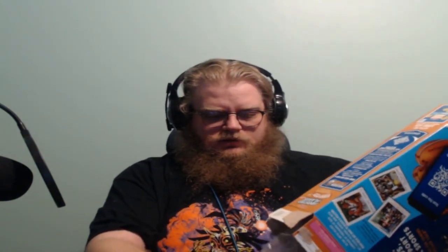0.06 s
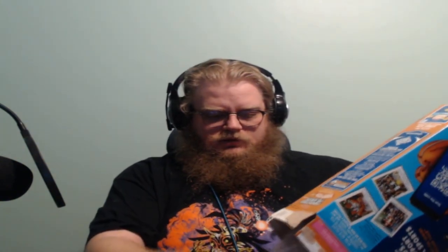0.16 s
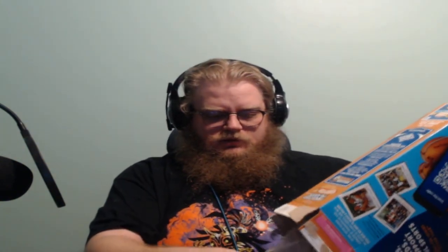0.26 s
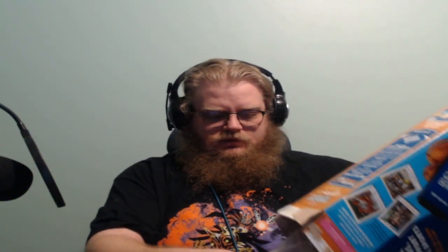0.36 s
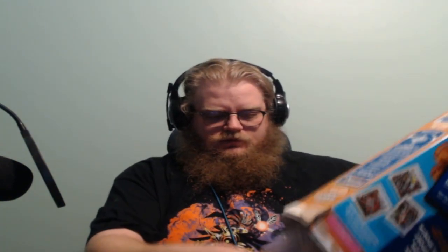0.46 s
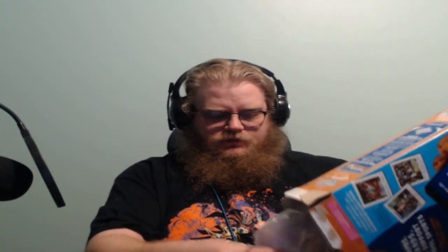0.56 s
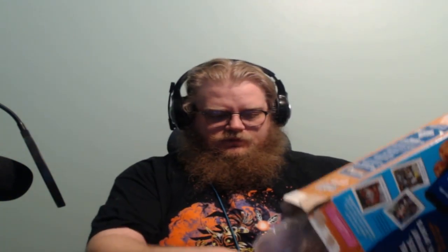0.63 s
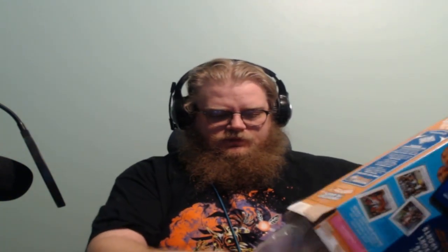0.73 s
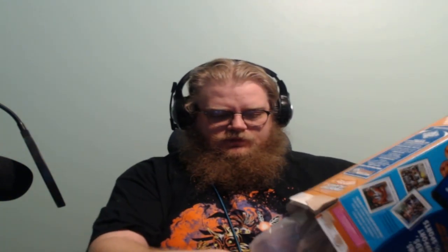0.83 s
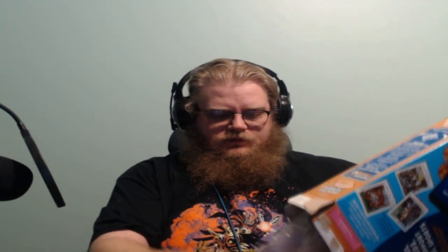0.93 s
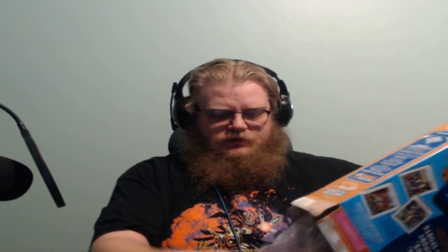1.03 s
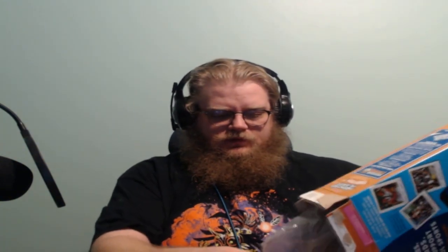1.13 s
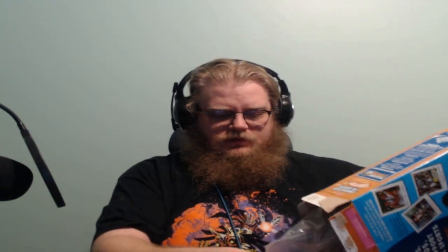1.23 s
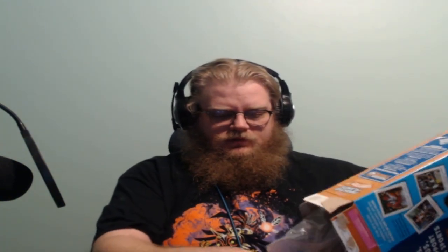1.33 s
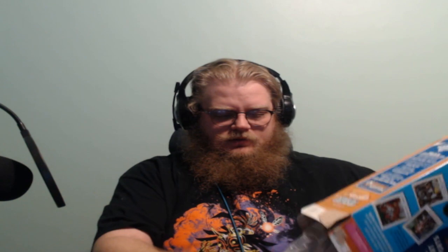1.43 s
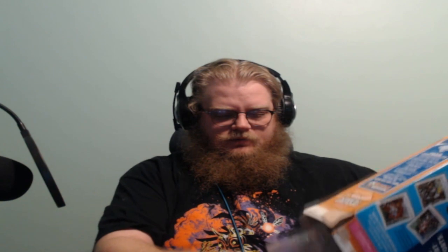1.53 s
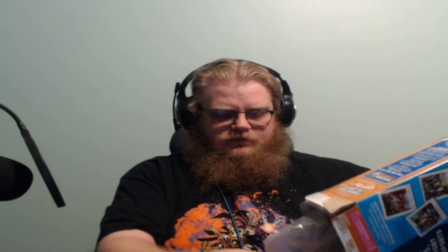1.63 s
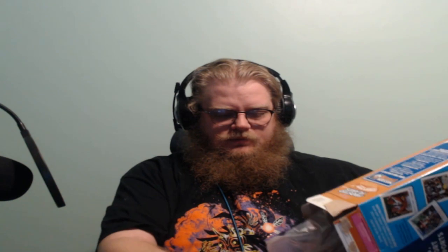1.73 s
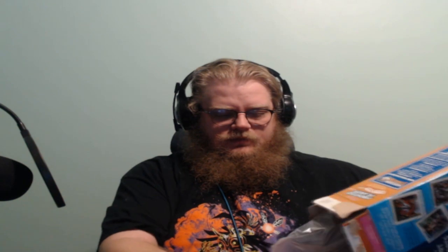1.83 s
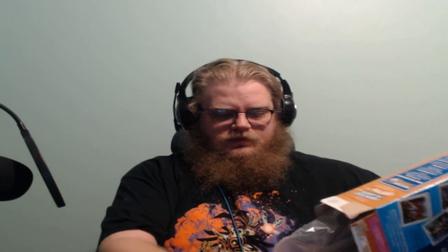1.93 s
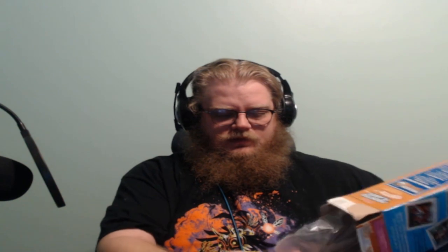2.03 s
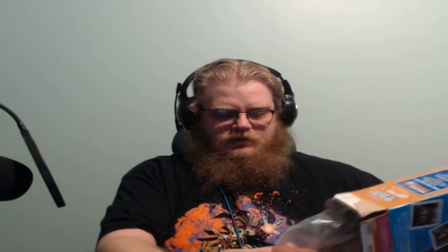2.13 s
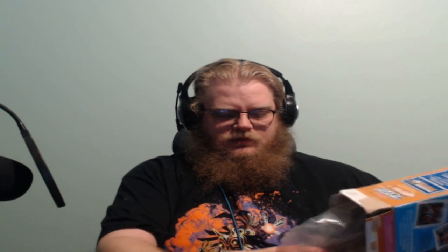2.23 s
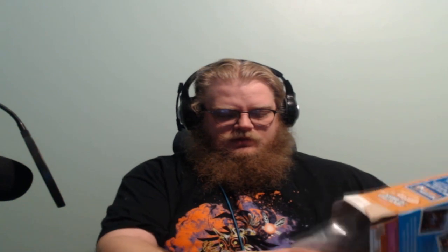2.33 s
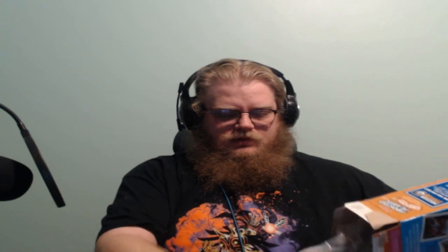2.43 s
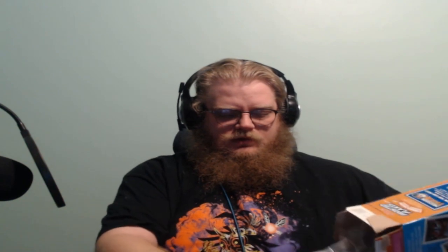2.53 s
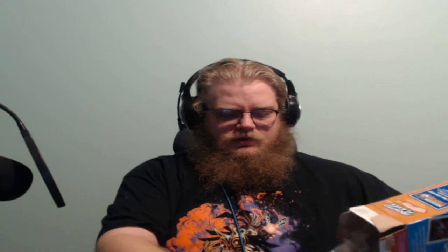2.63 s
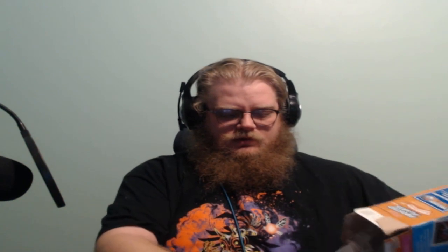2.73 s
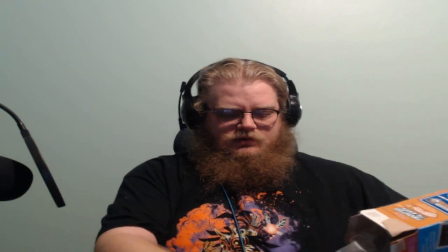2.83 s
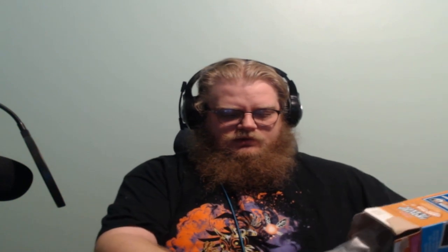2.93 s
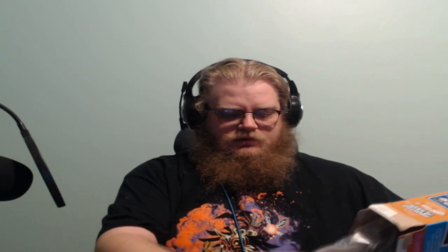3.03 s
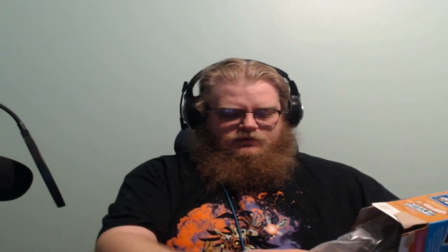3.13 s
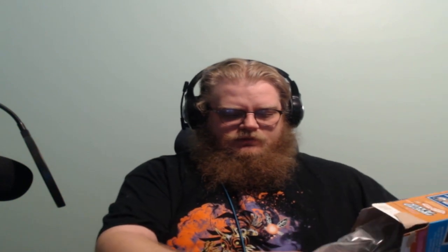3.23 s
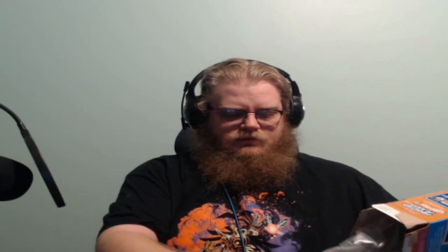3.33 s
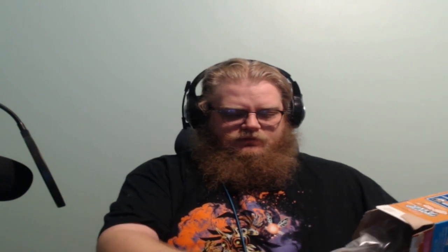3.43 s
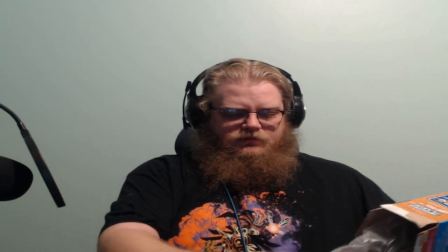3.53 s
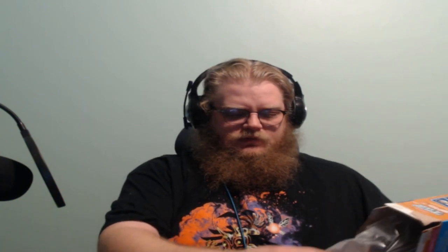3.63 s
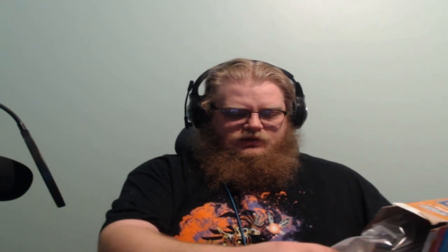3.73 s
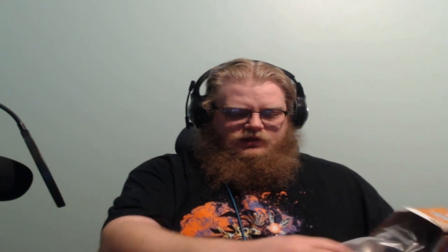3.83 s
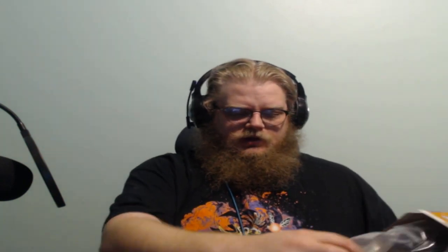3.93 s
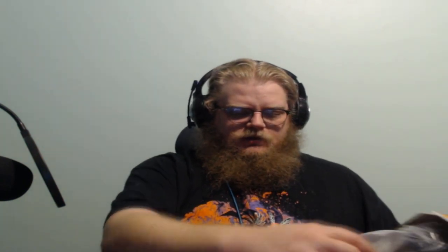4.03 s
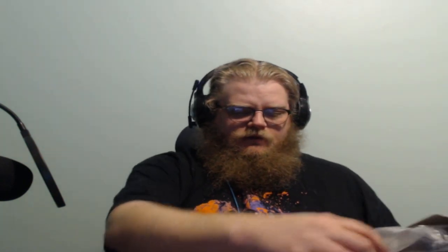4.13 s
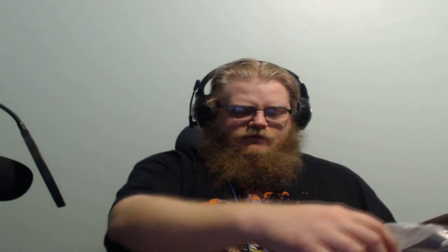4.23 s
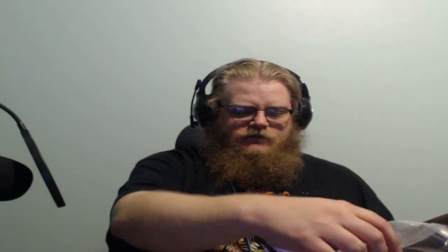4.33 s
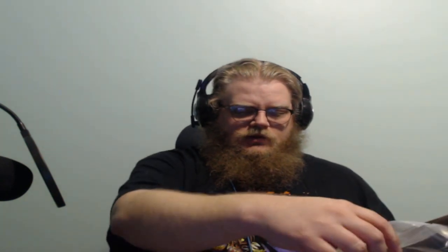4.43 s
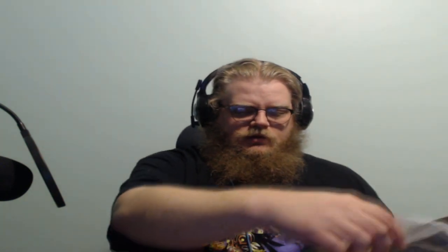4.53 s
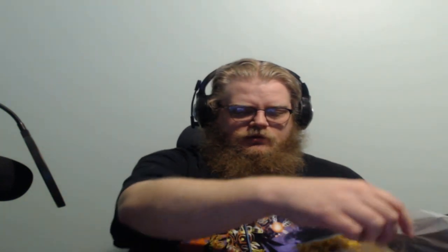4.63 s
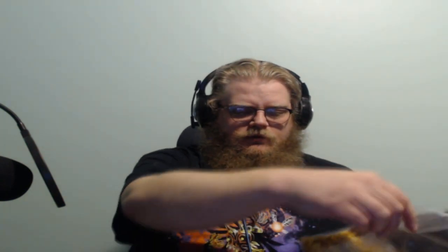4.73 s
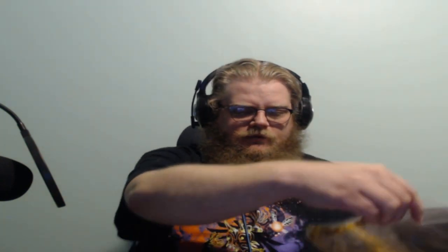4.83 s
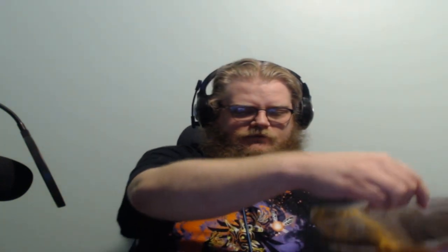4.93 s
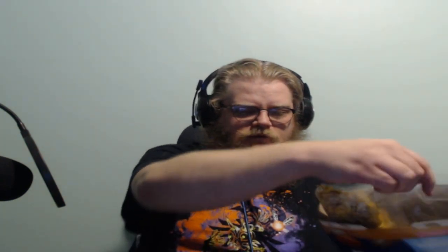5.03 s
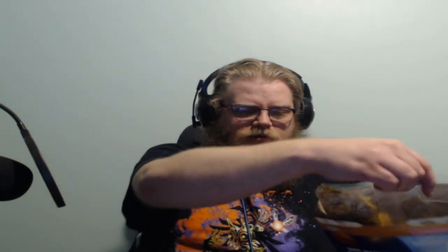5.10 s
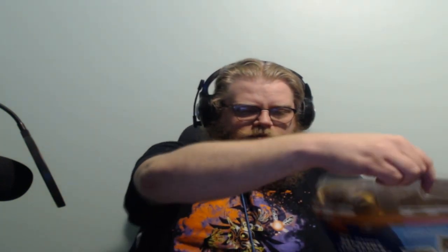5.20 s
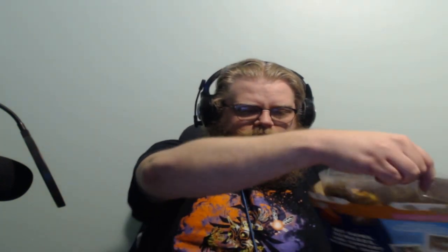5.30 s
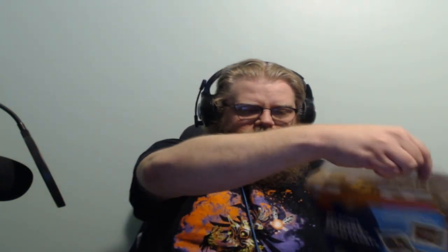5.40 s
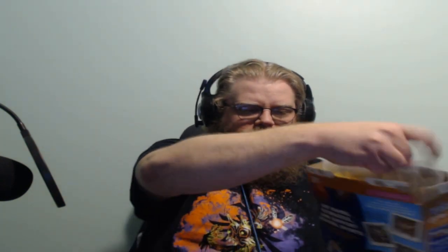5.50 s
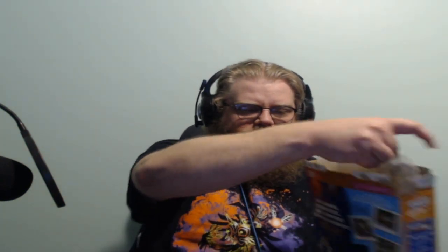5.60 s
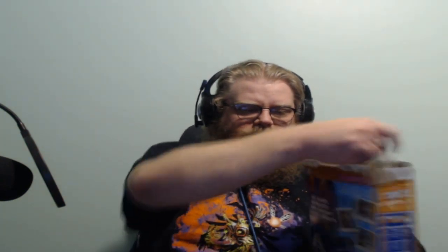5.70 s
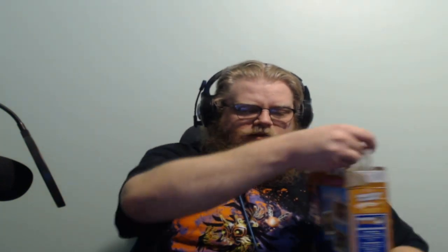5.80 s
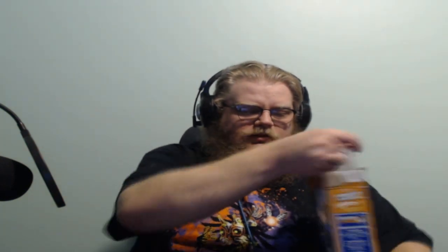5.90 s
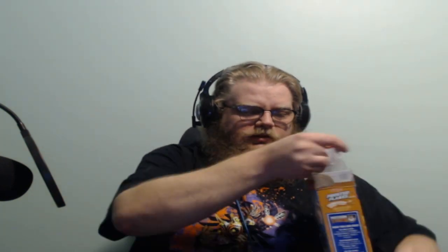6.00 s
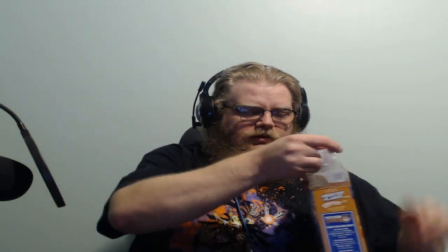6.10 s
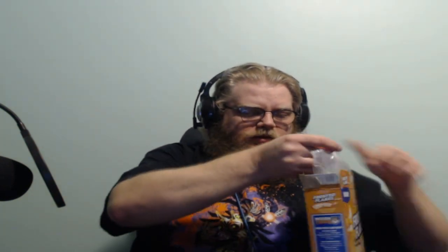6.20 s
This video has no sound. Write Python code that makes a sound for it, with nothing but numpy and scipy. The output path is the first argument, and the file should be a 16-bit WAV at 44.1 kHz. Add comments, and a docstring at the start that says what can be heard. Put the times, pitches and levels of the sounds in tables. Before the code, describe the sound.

Dry cereal pours from a plastic bag inside a cardboard box into a bowl, rustling in uneven surges with crunches, sharp bag cracks and soft box thumps. The stream thins to single flakes ticking and skittering on the ringing bowl, broken by brief silences. Then the box tips back and the flakes slide down and thump at its bottom. Close microphone at a desk in a small dry room, with a faint fan hum.

```python
"""Dry cereal slides from a plastic bag in a cardboard box into a bowl on a desk, close up, over a fan's hum.
For nearly three seconds the stream of colliding flakes rustles, handfuls crunch, the bag snaps and cracks
and the box thumps. In the lull that follows, single flakes tick and skitter on the ringing bowl, and the
sound drops out three times. From 4.6 s the box is tipped back: the flakes slide home and thump on its
bottom."""
import sys
import numpy as np
from scipy import signal
from scipy.fft import rfft, irfft
from scipy.io import wavfile

SR = 44100
rng = np.random.default_rng(int(sys.argv[2]) if len(sys.argv) > 2 else 0)


def to_wav(s):
    """Save 16-bit WAV."""
    ch = np.atleast_2d(s).T  # columns
    pcm = np.round(np.clip(ch, -1, 1) * 32767)  # PCM
    wavfile.write(sys.argv[1], SR, pcm.astype(np.int16))


N = 276066


def amp(db):
    """Gain of a level in dB."""
    return 10 ** (np.asarray(db) / 20)


def unit_rms(x):
    """The signal scaled to rms 1."""
    return x / np.sqrt(np.mean(x ** 2) + 1e-20)


def eq_db(curve, hz):
    """Level of an EQ curve at hz, read on a log frequency axis."""
    curve_hz, curve_db = np.transpose(curve)
    return np.interp(np.log(hz), np.log(curve_hz), curve_db)


def drift(rate_hz):
    """Smooth random modulation of rms 1."""
    pole = np.exp(-80 * np.pi * rate_hz / SR)
    slow = signal.lfilter([1], [1, -2 * pole, pole * pole], rng.standard_normal(N // 40 + 2002))[2000:]
    return np.interp(np.arange(N) / 40, np.arange(len(slow)), unit_rms(slow))


def band(x, low_hz, high_hz):
    """Gentle band-pass."""
    sos = signal.butter(2, [low_hz, min(high_hz, .45 * SR)], "band", fs=SR, output="sos")
    return signal.sosfilt(sos, x)


def resonance(x, hz, width_hz):
    """Two-pole resonator with gain 1 at its peak."""
    r = np.exp(-np.pi * width_hz / SR)
    gain = (1 - r * r) / 2
    return signal.lfilter([gain, 0, -gain], [1, -2 * r * np.cos(2 * np.pi * hz / SR), r * r], x)


def contacts(per_s, spread_db):
    """Random clicks at rms 1; a positive spread makes a few stand out from many small ones."""
    sizes = amp(spread_db * np.minimum(rng.exponential(1, N), 5)) * rng.choice([-1, 1], N)
    return unit_rms(sizes * (rng.random(N) < per_s / SR))


def add(out, start_s, sound):
    """Mixes a short sound in at start_s."""
    at = round(start_s * SR)
    out[at:at + len(sound)] += sound[:N - at]


def decay(t60, size=9000):
    """An envelope that falls 60 dB in t60 seconds."""
    return amp(-60 * np.arange(size) / (SR * max(t60, .0005)))


def swell(t60, rise_s, size=9000):
    """A decay with a rounded attack."""
    return (1 - np.exp(-np.arange(size) / (SR * rise_s))) * decay(t60, size)


# The hum of fan and motor. Each row: pitch in Hz, level in dB.
FAN_TONES = [(40, -71), (48, -72.5), (120, -73.5), (140, -81), (242, -74)]
# The colour of the fan's moving air. Each row: frequency in Hz, relative level in dB.
FAN_AIR_EQ = [(20, -3), (35, 0), (60, -5), (85, -16), (170, -12), (300, -14), (1000, -24), (15000, -42)]


def fan():
    """Two close low tones beat into a throb, with wavering motor hum and a soft bed of air."""
    t = np.arange(N) / SR - .012   # the tones are in phase at 12 ms
    hum = sum(np.sqrt(2) * amp(db + 3 * drift(5.2)) * np.cos(2 * np.pi * hz * t) for hz, db in FAN_TONES)
    hz = np.maximum(np.fft.rfftfreq(N, 1 / SR), 1)
    air = irfft(rfft(rng.standard_normal(N)) * amp(eq_db(FAN_AIR_EQ, hz)) * (hz > 18), N)
    return hum + amp(-71) * unit_rms(air)


def hiss(until_s):
    """A very faint, flickering top-end hiss that cuts off at until_s."""
    out = amp(-82.5 + 5 * drift(7.3)) * band(rng.standard_normal(N), 10000, 16000)
    out[round(until_s * SR):] = 0
    return out


def room(x, t60=0.2, wet_db=-13):
    """The reverb of a small dry room: a short noise tail in a low and a high band."""
    low, high = rng.standard_normal((2, 9000))
    tail = band(low, 120, 3200) * decay(t60) + band(high, 2700, 12000) * decay(1.1 * t60)
    tail[:130] = 0   # pre-delay: a metre of path to the first reflection
    return amp(wet_db) * signal.fftconvolve(x, tail / np.linalg.norm(tail))[:N]


# Holes in the lull. Each row: start of the fade, end of the fade, return to full level, all in seconds.
DROPOUT_TIMES = [(3.29, 3.352, 3.588), (3.94, 3.98, 4.075), (4.43, 4.49, 4.577)]


def dropout_gain(depth_db=45, return_s=.012):
    """A fader that sinks to near silence in each drop-out and springs back."""
    t, gain_db = np.arange(N) / SR, np.zeros(N)
    for fade, down, back in DROPOUT_TIMES:
        gain_db -= depth_db * np.interp(t, [fade, down, back - return_s, back], [0, 1, 1, 0]) ** 1.85
    return amp(gain_db)


# Weight landing in the box. Each row: start in seconds, relative level in dB, pitch of the wall in Hz.
BOX_THUMPS = [(0.158, -21.5, 243), (0.55, -17.5, 305), (1.035, -19, 336), (2.078, -24, 344),
              (2.27, -25, 413), (2.406, -20.5, 241), (2.49, -25, 400), (2.182, -26, 347),
              (2.612, -18.5, 450), (2.995, -37, 332), (3.93, -55, 355), (4.746, -39, 310),
              (2.976, -37, 333), (3.238, -29, 334), (5.3, -24, 165), (5.505, -16, 394), (5.572, -17, 404),
              (4.081, -27.5, 521), (4.083, -32, 361), (5.75, -18, 126.4), (5.772, -16, 130),
              (5.691, -28.5, 151), (5.748, -32, 66), (5.99, -38, 41), (5.82, -26, 141),
              (5.871, -30.5, 45.7), (5.997, -27.5, 128)]


def box_thumps(size=18000):
    """A push sets a cardboard wall ringing low; the blow itself is a higher knock of a few cycles."""
    out, t = np.zeros(N), np.arange(size) / SR
    for start, db, hz in BOX_THUMPS:
        wall_t60 = 0.12 * (330 / hz) ** 0.4   # deeper walls ring longer
        wall = np.sin(2 * np.pi * hz * t) * swell(wall_t60, 0.23 / hz, size)
        knock = np.sin(2 * np.pi * 1.4 * hz * t) * swell(6.3 / hz, 0.17 / hz, size)
        add(out, start, amp(db - 10.5) * (wall + amp(-1.5) * knock))
    return out


# The ring of the bowl. Each row: pitch in Hz, bandwidth in Hz, gain in dB.
BOWL_MODES = [(1370, 29, -12), (2140, 15, -25.5), (3074, 37, -3.5), (3280, 65, -6), (4340, 38, -8),
              (5530, 30, -8.5), (6750, 290, -6), (7800, 300, -4)]
# Flakes skittering on the bare bowl. Each row: start in seconds, level in dB, 60 dB decay in seconds.
SKITTERS = [(2.807, -23.5, 0.18), (2.967, -28.5, 0.2), (3.201, -35, 0.28), (3.581, -33, 0.4),
            (4.25, -53, 0.15)]


def bowl_skitters(size=12000):
    """Each skitter is a dying run of hops that strikes every mode of the bowl with a random strength."""
    out, hops = np.zeros(N), contacts(600, spread_db=4)
    for start, db, t60 in SKITTERS:
        run = hops[round(start * SR):][:size] * swell(t60, 0.0029, size)
        for hz, width_hz, mode_db in BOWL_MODES:
            strength = amp(db + mode_db + 3.2 * rng.standard_normal())
            add(out, start, strength * resonance(run, hz, width_hz))
    return out


def rattle(hz, t60, q, size=3000):
    """One clean touch and a short run of lighter contacts ring a flake's one resonance; peak 1."""
    touches = rng.standard_normal(size) * swell(t60, 0.0018, size)
    touches[0] = np.linalg.norm(touches)   # the first touch has as much energy as all the rest
    ring = resonance(resonance(touches, hz, hz / q), hz, hz / q)
    return ring / np.abs(ring).max()


# Single flakes and creases. Each row: start in seconds, level in dB, pitch in Hz.
FLAKE_TICKS = [(0.066, -24, 7500), (1.047, -32, 6340), (1.56, -37, 4960), (1.68, -36, 3100),
               (1.442, -29.5, 2480), (1.472, -24, 4000), (1.914, -44.5, 5500), (1.797, -38.5, 3670),
               (1.931, -36, 4300), (1.955, -36, 3860), (2.276, -26, 11300), (2.323, -27, 2420),
               (2.357, -33, 2380), (2.757, -26.5, 10000), (2.804, -37, 11600), (2.81, -44, 3130),
               (2.823, -30, 6170), (2.845, -34.5, 2020), (2.968, -44, 4200), (2.976, -37.5, 4260),
               (3.001, -47, 4200), (3.242, -42, 1515), (3.826, -51.5, 905), (2.974, -36.5, 1355),
               (3.035, -44.5, 2650), (3.202, -51, 5770), (3.223, -41.5, 886), (3.274, -45, 7460),
               (3.586, -44, 8700), (3.623, -43, 6730), (3.689, -49, 2370), (3.709, -46, 10500),
               (3.767, -43, 6500), (3.785, -44.5, 669), (3.789, -45, 1770), (3.792, -45, 4860),
               (3.904, -50.5, 4760), (4.117, -37, 11800), (4.201, -51, 2430), (4.2067, -41.5, 893),
               (4.251, -43.5, 5200), (4.281, -48.5, 1846), (4.309, -45, 6500), (4.325, -51.5, 3250),
               (4.325, -48, 6000), (4.353, -44, 11900), (4.445, -62, 7340), (5.026, -49, 3130),
               (5.257, -40, 8000), (5.765, -42, 2510), (5.843, -37.5, 4930), (5.985, -38, 3820),
               (6.123, -40, 2510)]


def flake_ticks(t60=0.045):
    """A flake lands: a pitched rattle and four weaker random partials over a broad scratch."""
    out = np.zeros(N)
    for start, db, hz in FLAKE_TICKS:
        ratios = 2 ** rng.uniform(-1.2, 1.2, 4)
        partials = sum(rattle(min(hz * ratio, 14000), t60, q=16) for ratio in ratios)
        body = rattle(hz, t60 * (2000 / hz) ** 0.3, q=7.1)   # higher flakes die sooner
        scratch = rattle(hz, 0.025, q=0.96)
        add(out, start, amp(db) * (body + amp(-12.5) * partials + amp(-1.5) * scratch))
    return out


# Handfuls crunching. Each row: centre in seconds, level in dB, half length in seconds, treble tilt in dB.
HANDFULS = [(1.517, -25, 0.0047, 9), (2.084, -29, 0.013, 9), (2.222, -31.5, 0.0025, 15),
            (2.247, -27.5, 0.015, -25), (2.278, -32, 0.0077, -9), (2.333, -28, 0.012, 3),
            (2.627, -30, 0.013, -12), (4.699, -32.5, 0.0088, 1), (4.805, -36, 0.0055, 14.5),
            (4.87, -40, 0.0049, 20.5), (4.884, -27, 0.0023, 6), (5.061, -26, 0.0053, -14),
            (5.166, -31.5, 0.0026, 10), (5.298, -24.5, 0.015, -6), (5.32, -25, 0.0044, 10),
            (5.373, -40, 0.0087, 10), (5.473, -28, 0.005, 7), (5.534, -23.5, 0.012, -0.5),
            (5.575, -26.5, 0.0078, -3.5), (6.105, -29, 0.0044, -6), (6.193, -28, 0.0045, -11)]


def handful_crunches():
    """Flakes crush together: dense grit under a bell-shaped swell, in a low and a high band."""
    low, high = np.zeros((2, N))
    t = np.arange(N) / SR
    for centre, db, half_s, tilt_db in HANDFULS:
        near = slice(int((centre - .05) * SR), int((centre + .05) * SR))
        bell = amp(db) * np.exp(-.5 * ((t[near] - centre) / half_s) ** 2)
        low[near] += bell
        high[near] += bell * amp(tilt_db)
    grit = contacts(8100, spread_db=-0.5)
    top = band(band(high * grit, 2800, 8360), 2300, 11690)
    return band(low * grit, 500, 3500) + amp(-4.5) * top


# Dry cracks of the bag. Each row: start in seconds, relative level in dB, pitch in Hz.
BAG_CRACKS = [(0.159, -15, 4000), (0.2174, -12, 7700), (0.5536, -15, 6140), (0.9071, -6, 9400),
              (1.046, -12, 12500), (0.949, -13.5, 2500), (1.224, -18.5, 2390), (1.24, -36, 4500),
              (1.311, -22, 2700), (1.36, -32, 4850), (1.4567, -3, 9630), (1.644, -17, 3300),
              (1.729, -24, 1500), (1.8173, -23, 5300), (2.132, -14, 3500), (2.168, -16, 4800),
              (2.178, -15, 7290), (2.27, -16, 4460), (2.2868, -11, 4430), (2.3564, -14, 12500),
              (2.596, -18, 6590), (2.605, -8.5, 6800), (2.757, -33, 10900), (2.809, -17, 11800),
              (2.825, -30, 6220), (2.847, -27, 3000), (2.978, -33, 4300), (2.9783, -29, 2100),
              (3.001, -35, 6400), (3.033, -35.5, 5530), (3.606, -35, 8270), (3.6244, -39, 8350),
              (3.645, -31, 8090), (3.709, -41, 10700), (4.09, -27.5, 9580), (4.116, -28, 12400),
              (4.177, -31, 13900), (4.3101, -39, 6400), (4.3557, -39, 11600), (4.7904, -26.5, 4320),
              (4.849, -20, 6630), (5.051, -24, 1500), (5.209, -18, 5450)]


def bag_cracks(ring_cycles=5.5, size=200):
    """A crease gives way in one click that rings for a few cycles at its own pitch."""
    out, t = np.zeros(N), np.arange(size) / SR
    for start, db, hz in BAG_CRACKS:
        ring = np.sin(2 * np.pi * hz * t + 1.1) * decay(ring_cycles / hz + 0.00078, size)
        add(out, start, amp(db - 2.5) * ring)
    return out


# Snaps of bag and flakes. Each row: start in seconds, relative level in dB, crispness in dB.
BAG_SNAPS = [(0.056, -19.5, 4), (0.159, -8.5, 3), (0.216, -18, 3.5), (0.245, -25.5, -10.5),
             (0.407, -21, 2.5), (0.445, -38, -12), (0.517, -21.5, 3.5), (0.529, -24, -1), (0.545, -18.5, 6),
             (0.551, -8, 2), (0.649, -22.5, 2), (0.713, -19, 4), (0.844, -27, -12.5), (0.88, -18, 4),
             (0.907, -11.5, 9), (0.946, -19.5, 3), (1.221, -30.5, 2), (1.31, -33, -10), (1.359, -32.5, -11),
             (1.455, -8.5, 3), (1.602, -27, -1), (1.617, -23, -7), (1.748, -28.5, 17), (1.817, -31, -6.5),
             (2.015, -36, 17), (2.046, -24.5, 8), (2.094, -34, 23.5), (2.238, -25, -9), (2.287, -24, 2),
             (2.312, -17, -1), (2.409, -14.5, 2.5), (2.42, -25, -11), (2.526, -21.5, 0), (2.595, -23.5, -3),
             (2.606, -22, 4), (2.707, -28, 20), (4.742, -20.5, -5), (4.774, -23.5, 8), (4.79, -22.5, -4),
             (5.21, -25, 3), (6.035, -25, -4.5), (6.102, -37, -13), (6.189, -35.5, 0)]


def bag_snaps():
    """The film snaps in a three-band noise burst: the lows swell later and last longer, the highs crack."""
    dull, middle, crisp = np.zeros((3, N))
    for start, db, crisp_db in BAG_SNAPS:
        middle_db = db - crisp_db / 2
        dull_db = -21 + 0.79 * (middle_db + 22) - 2 * rng.standard_normal()
        t60 = 0.035 * amp(0.074 * (middle_db + 36))   # bigger snaps last longer
        add(dull, start, amp(dull_db) * swell(1.54 * t60, 0.0041))
        add(middle, start, amp(middle_db + 3) * (swell(0.013, 0.0019) + 0.66 * swell(t60, 0.0019)))
        add(crisp, start, amp(middle_db + crisp_db + 5) * (swell(0.01, 0.0019) + 0.13 * swell(t60, 0.003)))
    noise = rng.standard_normal(N)
    noise[[round(start * SR) + 12 for start, _, _ in BAG_SNAPS]] = 2.5   # a clean click as the film gives
    return band(dull * noise, 140, 1400) + band(middle * noise, 740, 5000) + band(crisp * noise, 3500, 11000)


# The steady flow of the pour. Each row: time in seconds, level in dB, treble tilt in dB.
STEADY_FLOW = [(0, -44.5, -5.5), (.12, -33.5, -2.5), (.33, -47.5, 7), (.5, -44.5, -5), (.66, -36.5, -5),
               (.84, -39, -11), (.97, -37, -6), (1.16, -48, 2.5), (1.4, -40.5, -11.5), (1.86, -51, -18),
               (1.99, -52, -35), (2.067, -34, -10.5), (2.33, -38.5, -2), (2.45, -42, -8.5),
               (2.62, -37.5, -4), (2.76, -52, 8), (2.86, -55.5, 12), (2.95, -74, 6.5), (4.546, -83.5, -12),
               (4.594, -45, -32), (4.66, -44, -45.5), (4.688, -39, -27), (4.87, -35, -4.5),
               (5.0, -38.5, -26), (5.45, -38, -10.5), (5.62, -41.5, -10.5), (5.99, -45, -20.5),
               (6.26, -69, -44)]
# Heaps slipping at once. Each row: start in seconds, level in dB, treble tilt in dB, 60 dB decay in seconds.
HEAP_SLIPS = [(.15, -48, -6, 0.37), (.405, -38, -16, 0.94), (.53, -30, -6, 0.15), (.885, -43.5, 26, 0.9),
              (1.216, -34, -15, 0.15), (1.436, -30, -4, 0.54), (1.599, -31, -5.5, 0.34),
              (1.69, -37.5, -7.5, 0.86), (1.881, -39, -9.5, 0.42), (2.969, -44.5, -13, 0.4),
              (3.196, -41.5, -11.5, 0.39), (3.586, -73, 29, 0.91), (3.778, -56, -18, 0.51),
              (4.064, -43.5, -1.5, 0.37), (4.2, -59, -24, 0.34), (4.25, -46.5, -29, 0.21),
              (5.289, -28.5, -10, 0.43), (4.67, -36, -9, 0.43), (5.1, -38.5, 5, 0.62),
              (5.474, -30, -8.5, 0.71), (5.698, -35, -21.5, 0.67), (6.02, -37, -2, 0.26),
              (6.093, -38.5, -19, 0.44), (6.183, -38, -18, 0.35)]


def pour_envelopes():
    """Level and treble of the stream in dB: the steady flow plus slips that swell fast and die away."""
    times, flow_db, flow_treble_db = np.transpose(STEADY_FLOW)
    t = np.arange(N) / SR
    power = amp(2 * np.interp(t, times, flow_db))
    weighted_treble = power * np.interp(t, times, flow_treble_db)
    for start, db, treble_db, t60 in HEAP_SLIPS:
        slip_power = (amp(db) * swell(t60, rise_s=0.0073, size=20000)) ** 2
        add(power, start, slip_power)
        add(weighted_treble, start, slip_power * treble_db)
    return 10 * np.log10(power), weighted_treble / power


def stream_ticks(level_db, treble_db, count=420):
    """Random flakes in the stream ring briefly at their own pitch, riding the level of the pour."""
    out = np.zeros(N)
    for when, height, length, weight in rng.random((count, 4)):
        at, hz = int(when * N), 1900 * 6.5 ** height
        stream_db = level_db[at] + eq_db(RUSTLE_EQ, hz) + .7 * height * treble_db[at]
        tick = rattle(hz, .004 + .01 * length, q=3, size=1500)
        add(out, when * N / SR, amp(stream_db + 4.5 + 11 * weight ** 2) * tick)
    return out


# The colour of the rustle. Each row: frequency in Hz, gain in dB.
RUSTLE_EQ = [(71, -36), (120, -2.5), (267, -5.5), (393, -1), (670, -3), (1400, -5.5), (2380, -5),
             (3110, -9), (7350, -7.5), (12800, -14), (16000, -14)]
# The ride on the stream's low end. Each row: time in seconds, gain in dB.
BASS_RIDE = [(0, -0.5), (.6, 0.5), (1.05, -8.5), (1.901, -12), (2.1, -3), (2.699, -0.5), (4.6, -4),
             (5.3, -1), (6.26, 5)]
# Resonances of the box's air and walls. Each row: pitch in Hz, bandwidth in Hz, gain in dB.
BOX_MODES = [(386, 280, -5.5), (1350, 180, -4.5), (2370, 60, -4.5)]


def flake_stream(level_db, treble_db):
    """Flakes collide in clumps and ring the box: light contacts differ by band, crunches hit all bands."""
    clumps = amp(2.5 * drift(35))
    impacts = np.abs(contacts(75 * clumps, spread_db=2.2))
    bursts = signal.fftconvolve(impacts, swell(0.01, 0.0007, size=2000))[:N]
    crunch = unit_rms(bursts * contacts(9000, spread_db=2))
    light = [contacts(3200 * clumps, spread_db=4) for _ in range(3)]
    bass_db = np.interp(np.arange(N) / SR, *np.transpose(BASS_RIDE))
    edges_hz = 110 * 2 ** np.arange(0, 7.4, .4)
    rustle = np.zeros(N)
    for k, (low_hz, high_hz) in enumerate(zip(edges_hz, edges_hz[1:])):
        hz = np.sqrt(low_hz * high_hz)
        boom_db = eq_db([(130, 0.66), (220, 0.76), (500, 0.93), (1200, 0.27)], hz)
        bass_share = np.interp(hz, [160, 300], [1, 0])
        treble_share = np.interp(np.log(hz), np.log([2830, 5900, 8400, 11330]), [0, 0.38, 0.55, 1])
        colour_db = eq_db(RUSTLE_EQ, hz) + boom_db + bass_share * bass_db + treble_share * (treble_db + 5)
        gain = amp(level_db + colour_db + 1.82 * drift(21))
        rustle += band(gain * (0.89 * light[k % 3] + 0.7 * crunch), low_hz, high_hz)
    box_ring = sum(amp(db) * resonance(rustle, hz, width_hz) for hz, width_hz, db in BOX_MODES)
    return amp(10.5) * band(rustle + box_ring, 105, 20000)


def scene():
    """Pour, room and fan meet at one close microphone, which feeds both channels."""
    level_db, treble_db = pour_envelopes()
    flakes = flake_stream(level_db, treble_db) + stream_ticks(level_db, treble_db) + flake_ticks()
    desk = flakes + bowl_skitters() + bag_snaps() + bag_cracks() + handful_crunches() + box_thumps()
    mono = dropout_gain() * (desk + room(desk) + fan())
    mono += hiss(until_s=DROPOUT_TIMES[0][2])   # stops as the first drop-out ends
    return np.array([mono, mono])


def record(dry):
    """A steep low-pass takes off everything above 16350 Hz."""
    return signal.sosfilt(signal.cheby2(20, 70, 16350, fs=SR, output="sos"), dry)


dry = scene()
out = record(dry)
to_wav(out)
```